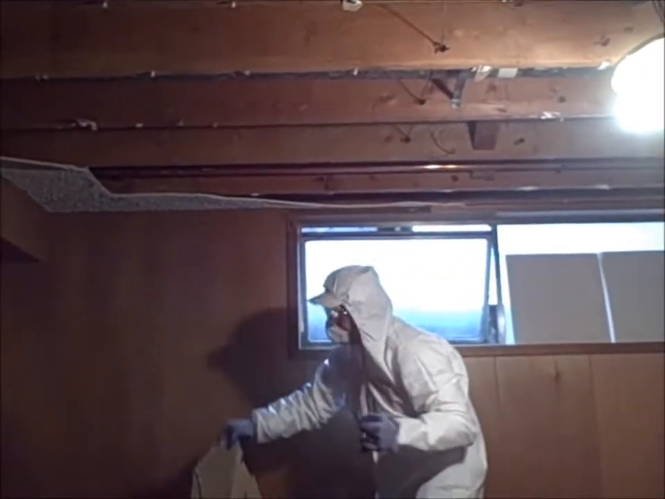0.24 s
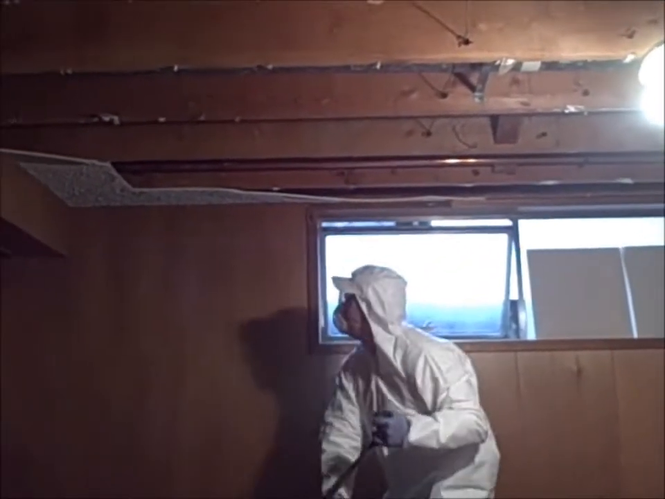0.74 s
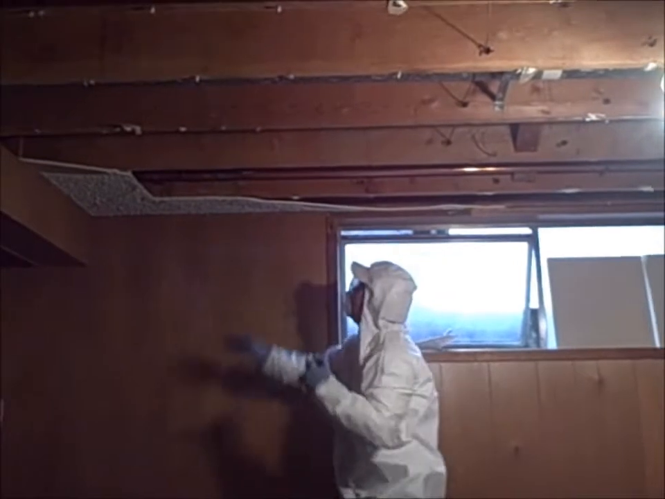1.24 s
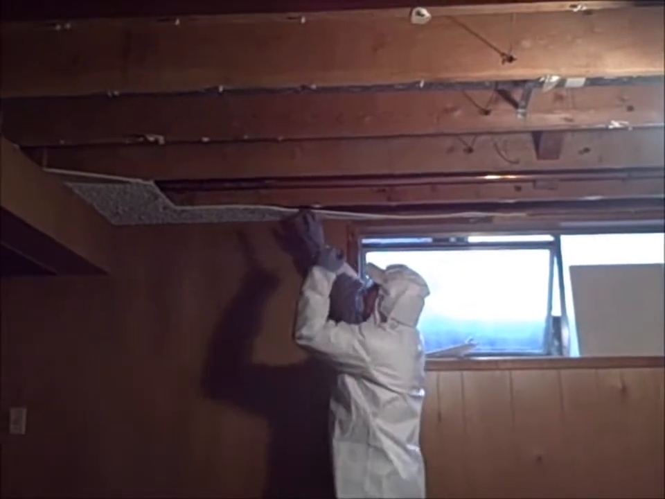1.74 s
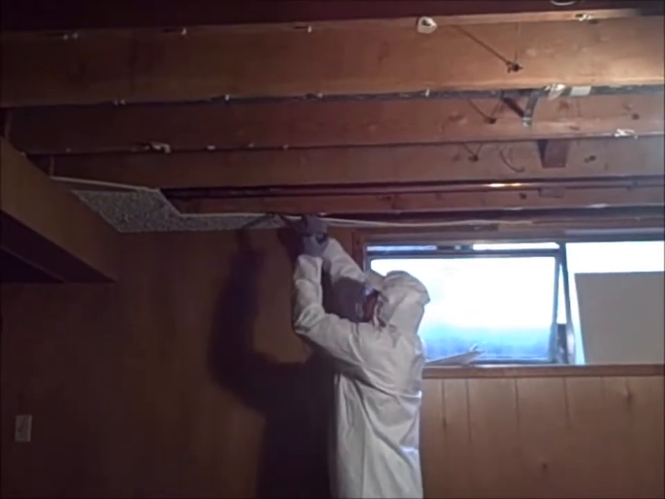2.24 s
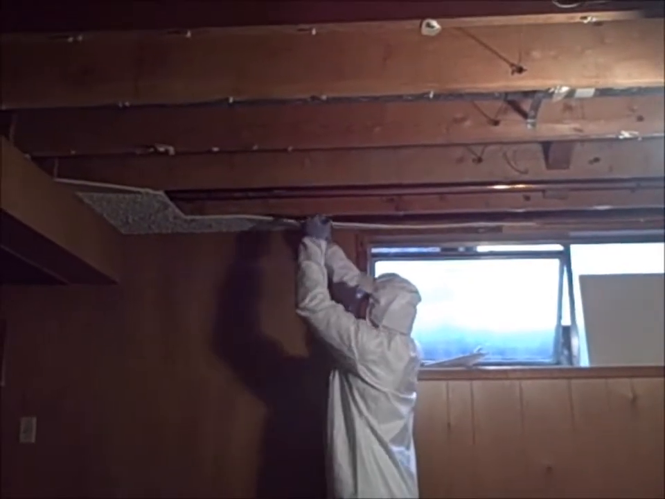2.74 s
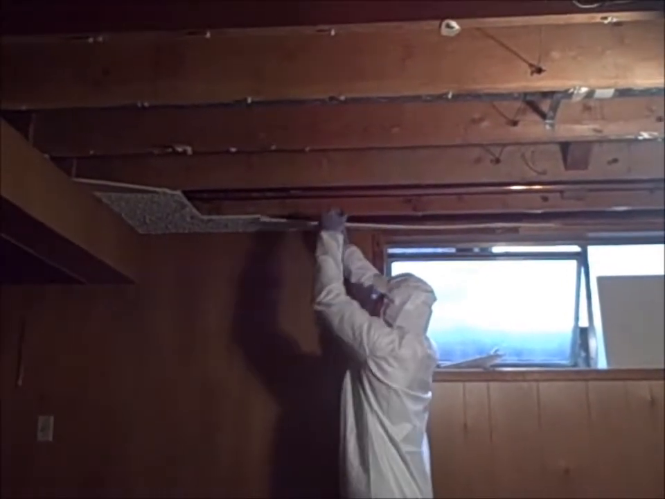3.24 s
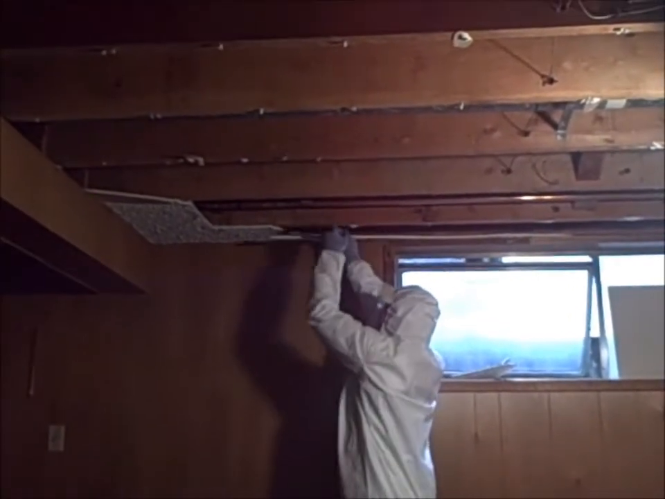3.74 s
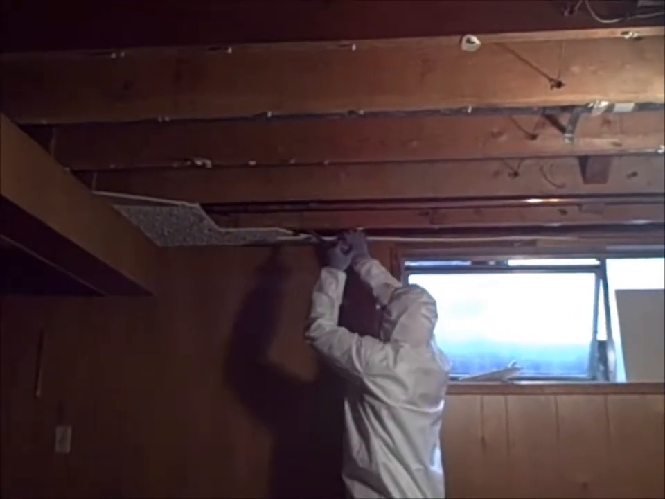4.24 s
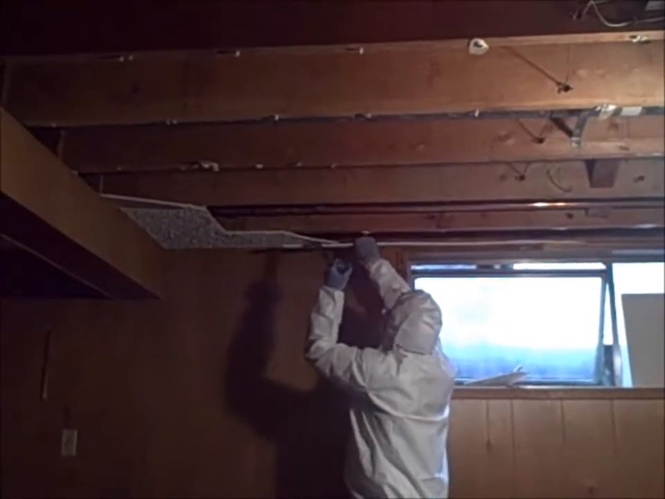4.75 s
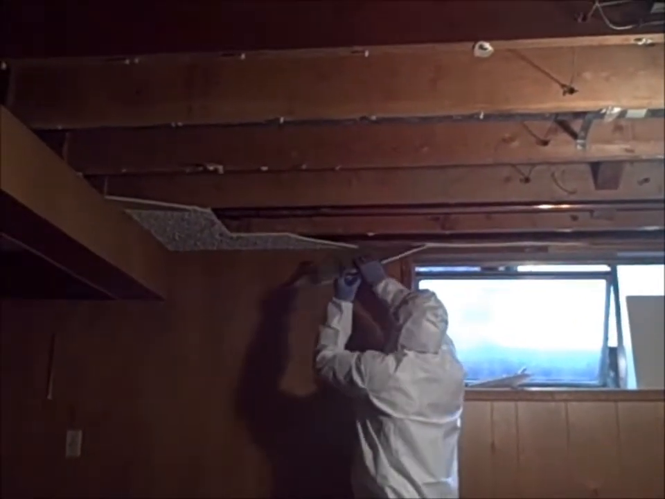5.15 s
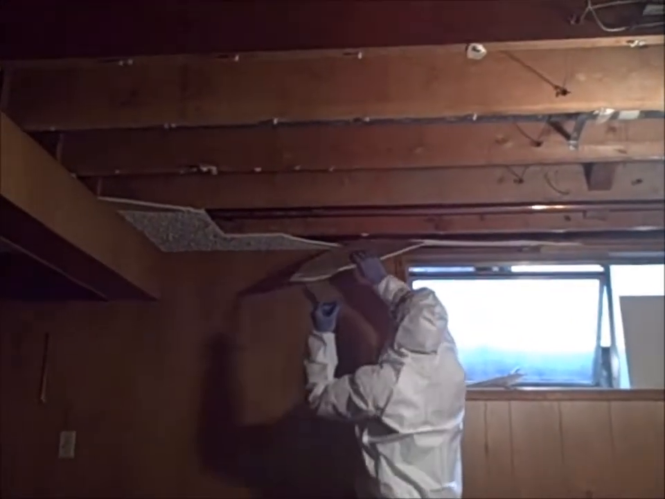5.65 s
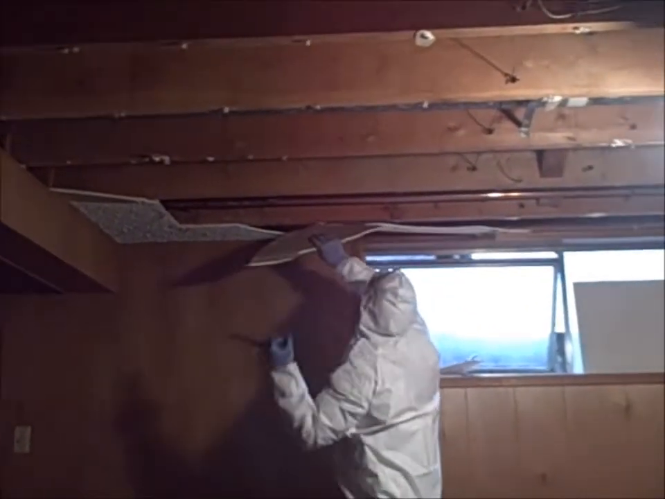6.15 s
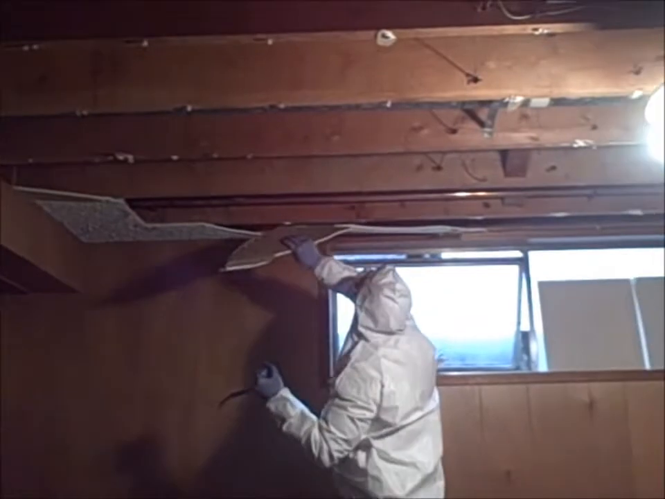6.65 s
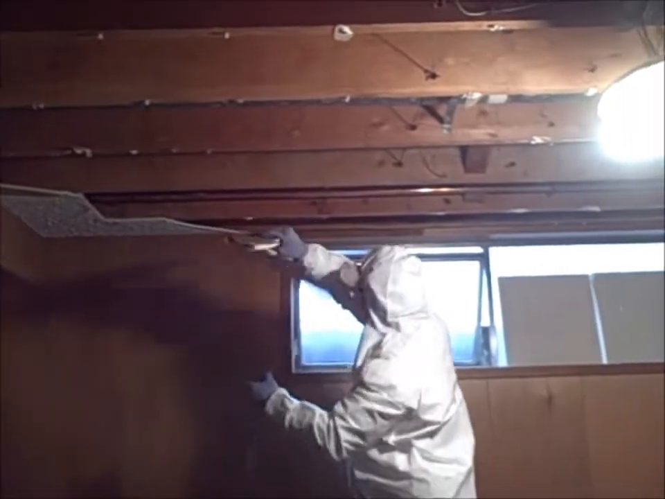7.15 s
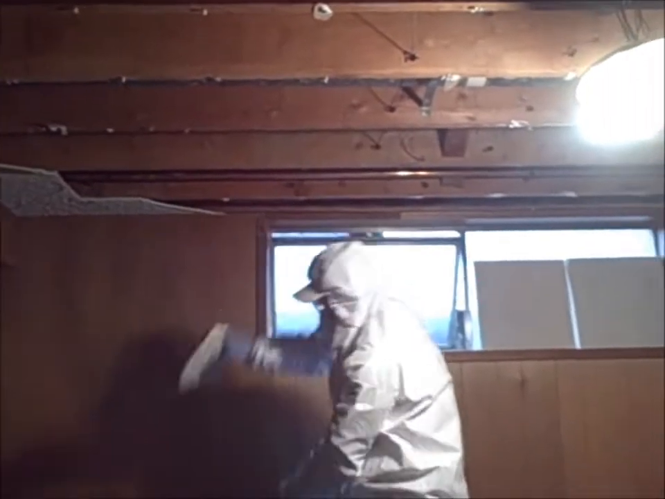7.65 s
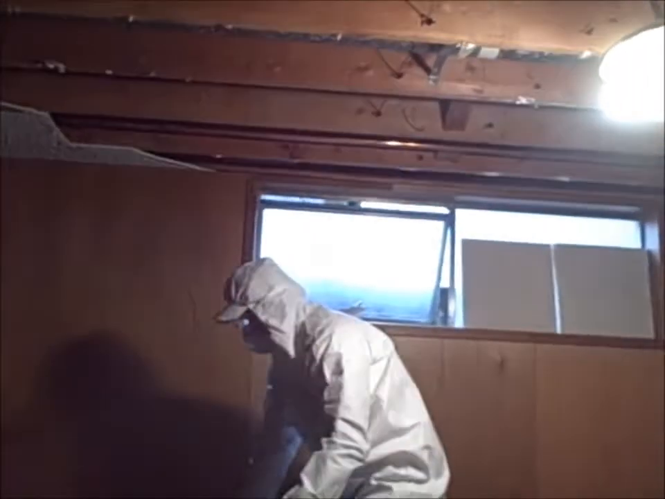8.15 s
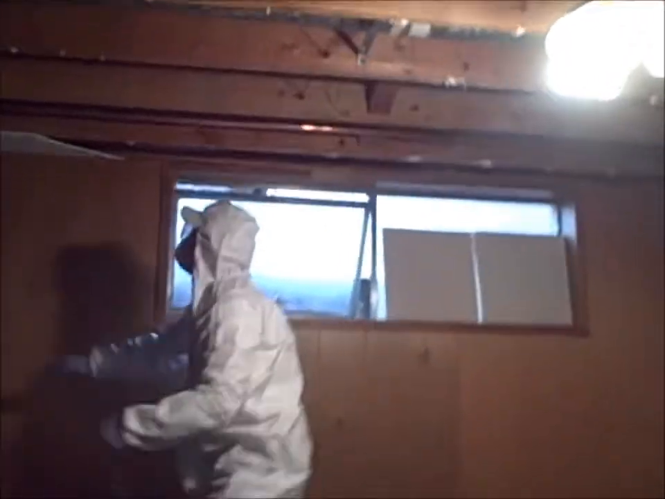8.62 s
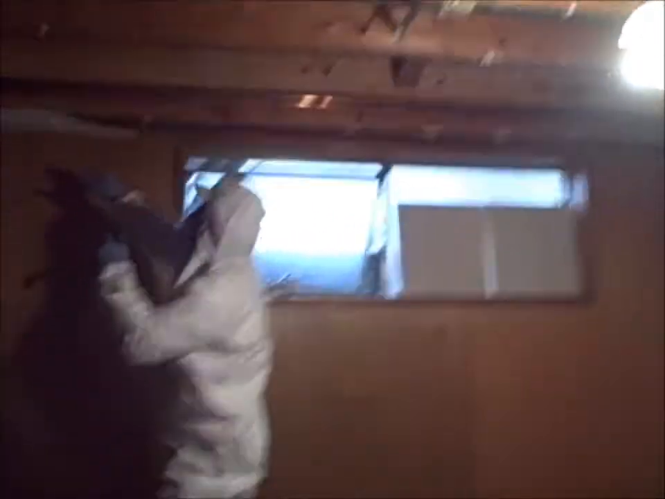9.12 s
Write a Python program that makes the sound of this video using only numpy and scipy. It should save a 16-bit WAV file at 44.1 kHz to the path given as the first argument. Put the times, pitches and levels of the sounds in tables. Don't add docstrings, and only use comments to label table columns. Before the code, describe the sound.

A faint bright hiss and papery suit rustle run throughout a low basement with a short, woody room ring. Soft rubs and light taps come first; from 0.8 to 1.25 s a panel lands with thuds, a sharp snap, low boom and falling crumbs. Rustling and slides fade by 2.4 s into small knocks. Low joist thumps build from 2.9 s, with a cracking break at 3.3 and a scrape with thin steel squeaks at 3.6. More knocks at 4.1-4.6 lead to a strong snapping thud at 4.93, then groaning, hollow boards at 5.2-5.4 and a tearing crack with a low ping at 5.8. Soft rubbing follows. Staples ping brightly at 7.04 and 7.16. Scraping, cracks, pings and ringing boards cluster from 7.45 to 8.05. The loudest hard knock, at 8.5, clatters with a rough squeal; crumbs and rustle trail to about 9.4.

```python
import sys
import numpy as np
from scipy import signal
from scipy.fft import rfft, irfft, next_fast_len
from scipy.io import wavfile
from scipy.ndimage import map_coordinates

SR = 44100
rng = np.random.default_rng(int(sys.argv[2]) if len(sys.argv) > 2 else 0)


def unload_wav(signal):
    wavfile.write(
        sys.argv[1],
        SR,
        np.round(np.clip(np.atleast_2d(signal).T, -1, 1) * 32767).astype(np.int16),
    )


def voltage_ratio(level):
    return 10 ** (np.asarray(level, float) / 20)


N = 413658
SPAN = 32768

# pitch_hz, time_to_fall_60_db_s
ROOM_DECAY = [(60, 0.1489), (150, 0.3057), (500, 0.49717), (1500, 0.31804), (4000, 0.34275),
              (8000, 0.27328), (16000, 0.1174)]
# pitch_hz, level_db
HUSH_COLOUR = [(15, -33.5), (25, -16.5), (129, -2.5), (291, -37.5), (460, -11), (1150, -2.5), (1460, -1),
               (3030, 9.5), (6110, 6), (13400, 1), (15700, 6)]
HUSH_DB = -66
# pitch_hz, gain_db
MIC_RESPONSE = [(20, -20), (40, 0), (13000, 0), (15000, 2.5), (15900, -1)]
TOP_HZ = 15950

# time_s, suit_rustle_db, fibre_scrape_over_rustle_db
MOTION = [(0.0, -52, -3.5), (0.26, -59.5, -3.5), (0.78, -56, -0.5), (1.0, -48, -2), (1.45, -47, -3),
          (1.8, -48, -4), (1.93, -61, 0.5), (2.28, -51, -4.5), (2.42, -73, 4), (4.2, -70.5, 1.5),
          (4.44, -54.5, -1), (5.25, -60.5, -5.5), (5.52, -67, 3), (6.25, -45.5, -1.5), (6.64, -64, 7),
          (7.14, -56.5, -2.5), (7.5, -54, -3.5), (9.3, -54, -1)]
# peak_s, rustle_db, fibre_scrape_over_rustle_db, rise_s_per_10_db, fall_s_per_10_db
CRUMB_SHOWERS = [(1.13, -36.5, 3, 0.04326, 0.1708), (2.6, -59, -2.5, 0.2659, 0.153),
                 (3.0, -59.5, -2.5, 0.2158, 0.1586), (3.37, -42, -19.5, 0.07758, 0.0649),
                 (3.79, -50.5, 1, 0.1262, 0.1349), (3.89, -55.5, 7, 0.1663, 0.0343),
                 (4.93, -49.5, -1, 0.1357, 0.3487), (5.42, -47, 6.5, 0.09258, 0.0248),
                 (5.88, -53, -15, 0.2076, -0.7883), (6.9, -51.5, -3, 0.179, -0.272),
                 (7.27, -50, -4.5, 0.1667, 0.8757), (7.68, -37.5, -2, 0.06146, 0.2698),
                 (7.86, -43.5, -19, 0.088, 0.2133), (7.99, -45, -12, 0.0529, 0.1454),
                 (8.52, -34, -14, 0.02876, -0.0853), (8.64, -53, 4, 0.0619, 0.6934),
                 (9.38, -44.5, 0.5, 0.0637, 0.08)]
# peak_s, panel_groan_db, joist_boom_db, rise_s_per_10_db, fall_s_per_10_db
STRAINS = [(0.89, -66.5, -53.5, 0.0628, 0.3115), (0.99, -47.5, -66.5, 0.0585, 0.2583),
           (1.13, -50.5, -31.5, 0.03085, 0.065), (1.24, -36.5, -49.5, 0.0996, 0.1014),
           (1.84, -67.5, -64.5, 0.0414, 0.22), (2.1, -67, -62.5, 0.3217, 0.4059),
           (2.56, -54.5, -53.5, 0.06267, 0.169), (3.03, -61.5, -56, 0.1209, 0.5),
           (3.36, -35.5, -35, 0.06339, 0.0888), (3.66, -41, -47, 0.0467, 0.1303),
           (3.8, -52.5, -49, 0.157, 0.3534), (4.33, -50, -48.5, 0.1275, 0.1157),
           (4.46, -53, -68.5, 0.1025, 0.0753), (4.99, -40.5, -37, 0.04823, 0.0843),
           (5.25, -43, -56, 0.0649, 0.2325), (5.41, -34.5, -38.5, 0.07657, 0.1107),
           (5.51, -47, -37.5, 0.058, 0.0277), (6.22, -62.5, -84, 0.353, 0.5),
           (6.88, -57, -56, 0.1574, -0.1907), (7.73, -43, -70, 0.07906, 0.2269),
           (7.93, -56, -48.5, 0.0645, 0.02), (8.1, -48, -59, 0.098, 0.0983),
           (5.7, -71.5, -56.5, 0.0524, -0.0024), (7.62, -58.5, -57.5, 0.0302, 0.0575),
           (8.38, -61.5, -68.5, 0.0753, 0.34), (8.62, -48, -52.5, 0.0648, 0.1992)]
# pitch_hz, level_db
SUIT_COLOUR = [(1500, -7), (3500, -4), (6000, 1.5), (9000, 2), (13500, 3), (15800, -6)]
# pitch_hz, level_db
FIBRE_COLOUR = [(500, -1), (1200, -1.5), (2200, -2.5), (4000, -2.5), (6000, -7.5), (9000, -13)]
# pitch_hz, width_hz, level_db
PANEL_MODES = [(312.44, 50.99, 1), (404, 114.67, 2), (645.5, 117.2, -1), (814.3, 183.17, -4.5),
               (1193.2, 196.4, -21.5)]
# pitch_hz, width_hz, level_db
JOIST_MODES = [(41.51, 13.31, -13.5), (98.45, 22.82, -4.5), (141.17, 20.46, 2.5), (246, 60.57, -3.5)]

# peak_s, level_db, pitch_hz, width_hz, fall_s_per_10_db
SQUEALS = [(2.53, -63, 9880, 150, -0.2031), (3.635, -52, 7978, 150, 0.0872),
           (3.66, -46.5, 3002, 249.6, -0.0328), (3.67, -47, 3544, 250.6, -0.0032),
           (3.76, -48.5, 3580, 150, -0.0028), (3.87, -51, 3811, 701.5, 0.0135),
           (3.91, -52, 2951, 199.6, 0.0655), (5.24, -45, 4507, 892.9, 0.1145),
           (5.41, -39.5, 4308, 1095, 0.0303), (7.79, -31.5, 2197, 1199, 0.0909),
           (8.52, -25, 2103, 897.5, 0.0599), (5.835, -37.5, 1501, 896.9, 0.0154)]
SQUEAL_RISE = 0.7301
# start_s, level_db, pitch_woken_most_hz, loss_away_from_it_db_per_octave
BAR_TAPS = [
    (2.478, -58.5, 9880, 28),
    (3.0, -67, 14800, 16),
    (3.64, -47.5, 9880, 27),
    (7.451, -42, 4590, 10),
    (7.675, -39, 9880, 16.5),
]
# pitch_hz, time_to_fall_60_db_s
BAR_MODES = [(2600, 0.1009), (4390, 0.3624), (5720, 0.0972), (9880, 0.3414), (14700, .16)]
# start_s, peak_db, pitch_hz, time_to_fall_60_db_s
WOOD_RINGS = [(1.07, -18.5, 386, 0.0878), (1.12, -23, 501.3, 0.1109), (1.12, -31, 688.7, 0.312),
              (1.121, -28, 123.9, 0.2985), (1.19, -30.5, 558.9, 0.2443), (1.29, -37.5, 642.2, 0.1904),
              (2.93, -49, 300.1, 0.191), (2.93, -52.5, 897.6, 0.2062), (2.03, -53, 249.6, 0.5067),
              (4.095, -28, 154.2, 0.1719), (4.268, -30.5, 998.9, 0.0954), (4.32, -36, 419.9, 0.308),
              (4.471, -39, 158.3, 0.2343), (5.207, -30, 606.9, 0.317), (5.21, -38, 885.8, 0.3104),
              (5.21, -33, 289.8, 0.4164), (5.25, -34.5, 600.4, 0.2553), (5.39, -34.5, 772.4, 0.2942),
              (5.4, -30, 333.4, 0.2967), (5.45, -31.5, 329.9, 0.3951), (5.82, -37.5, 1750, 0.203),
              (7.61, -36, 1600, 0.1666), (7.882, -25, 404, 0.3233), (7.882, -24.5, 532.4, 0.374),
              (7.884, -25, 770, 0.3721), (7.884, -32.5, 888.1, 0.364), (8.02, -37, 400.4, 0.3852),
              (7.882, -26.5, 214.4, 0.2881), (8.472, -25.5, 389.7, 0.214), (8.472, -28, 199.1, 0.2115),
              (8.506, -21, 170.1, 0.2874), (8.56, -26.5, 811.3, 0.5155), (0.83, -39.5, 120.8, 0.4087),
              (3.32, -34, 996.9, 0.218), (4.268, -32.5, 701.6, 0.1998), (4.27, -36, 1297, 0.1519),
              (5.822, -36.5, 449, 0.203), (7.16, -48, 599.5, 0.1993), (1.13, -27.5, 260.4, 0.4026)]
# pitch_hz, level_db, time_to_fall_60_db_s
OFFCUT_MODES = [(340.31, -17, 0.7064), (734, -6, 0.3067), (790.83, -11.5, 0.585), (1225, -3, 0.281),
                (1365.7, -6.5, 0.1581), (1806, -7.5, 0.233), (1960, -7, 0.3336), (2292.4, -10.5, 0.327),
                (2634.6, -0.5, 0.1468), (2886.1, -5, 0.244), (3649.2, -6, 0.1577), (3879.6, -12, 0.3446),
                (3942.2, -6.5, 0.1592), (4350, -12.5, 0.2426)]
# start_s, level_db
OFFCUT_HITS = [
    (8.473, -37.5),
    (8.506, -24),
    (8.515, -27),
]
# start_s, peak_db, pitch_hz
STAPLES = [
    (4.158, -38, 3039),
    (5.832, -25.5, 1602),
    (7.042, -21, 4545),
    (7.161, -18.5, 3866),
    (7.78, -23.5, 2599),
    (8.022, -24, 2199),
]
# start_s, level_db
PANEL_DROPS = [
    (0.833, -52),
    (.95, -43),
    (1.118, -34),
    (1.22, -43.5),
]

# start_s, peak_db, board_pitch_hz, floor_boom_db
THUDS = [(0.644, -49.5, 915, -23.5), (0.826, -32.5, 699.8, -10.5), (0.945, -21.5, 109.3, -12),
         (1.07, -15.5, 387.7, -25.5), (1.118, -19, 406.3, -7.5), (2.472, -35.5, 270.1, -12),
         (2.539, -40, 162.5, -16.5), (2.932, -32.5, 145.5, -6.5), (3.225, -26.5, 146.5, -1),
         (3.311, -20.5, 321.4, -9), (3.638, -24, 162, -9), (4.101, -32.5, 151.5, -13),
         (4.266, -23, 474.1, -28.5), (4.48, -31, 160, -7.5), (4.635, -33, 147.9, -19),
         (4.931, -13, 328.5, -13), (5.206, -29.5, 593.2, -18.5), (5.399, -17.5, 308.3, -18.5),
         (5.821, -35.5, 455, -35), (6.877, -34.5, 233.1, -26.5), (7.037, -42, 598.3, -25),
         (7.16, -41, 654.7, -18.5), (7.445, -43, 991, -23), (7.608, -27, 431.1, -35),
         (7.769, -31.5, 419.9, -27), (7.88, -18.5, 424.2, -29), (8.013, -36.5, 372.7, -6.5),
         (8.473, -20, 783, -6), (8.504, -9.5, 771, -15)]
# start_s, peak_db, pitch_hz
OVERTONES = [(0.837, -36.5, 391.9), (0.943, -32.5, 111.3), (1.112, -23.5, 851.9), (2.94, -33, 276.4),
             (3.636, -25.5, 246), (4.265, -35, 905.1), (4.932, -34, 901.9), (5.206, -20, 245.6),
             (5.245, -25.5, 594.9), (7.88, -18, 755.5), (7.88, -17.5, 232.9), (7.882, -18.5, 388.2),
             (7.894, -20, 801.5), (8.014, -39, 204.8), (8.508, -20.5, 757.7), (8.506, -15, 389.1),
             (8.529, -15.5, 843.9)]
BOARD_T60, OVERTONE_BOOM_DB = 0.060797, -22
# pitch_hz, width_hz, level_db
FLOOR_MODES = [(133.85, 16.9, -5.5), (183.9, 86.93, 6)]

# start_s, peak_db
FIBRE_POPS = [
    (0.9694, -28),
    (1.1203, -9.5),
    (4.929, -21),
    (5.8236, -21),
    (8.021, -13.5),
]
# start_s, peak_db, body_db, top_db
RUBS = [(0.1245, -42.5, -11.5, -13), (0.298, -45.5, -2.5, 1.5), (0.3302, -38, -19.5, -2.5),
        (0.7427, -34, -13, -18.5), (1.2438, -42.5, -15, -9), (1.722, -34.5, -3.5, 6),
        (2.0694, -49, -12, -4), (2.1993, -43, -9.5, -5), (2.259, -42.5, -8, 0.5), (2.529, -42, -10, -9),
        (2.7997, -51, -9, -1.5), (3.2095, -37.5, -11, -10.5), (3.6203, -28, -17.5, -10),
        (3.6402, -23.5, -16, -12), (3.7575, -44.5, -12.5, -12), (4.5694, -40, -7, 1.5),
        (4.806, -42, -9.5, 3), (5.203, -30, -17, -4.5), (5.35, -31, -14, -5), (6.011, -39.5, -21, 3),
        (6.0758, -36, -9, 0), (7.358, -38.5, -20.5, -0.5), (7.5266, -30, -16.5, -7.5),
        (7.6672, -19.5, -11, -7.5), (7.999, -21.5, -11.5, -5.5), (8.0138, -23, -11, -36),
        (8.9094, -38.5, -7.5, 2.5), (9.0092, -39, -0.5, 1.5), (9.2323, -34.5, -6.5, -4)]
# start_s, peak_db, body_db, top_db,
# first_snap_db
HARD_CRACKS = [(0.2159, -43, -7.5, -9.5, -3), (0.268, -44, -14, -5.5, -2.5), (0.6469, -47.5, -0.5, 7, -5),
               (0.8277, -25.5, -13, -4.5, -9), (0.9477, -30.5, -11, -4.5, -15),
               (0.9687, -27.5, -18.5, -5.5, 0), (1.07, -27, -10, -5.5, -8), (1.1173, -30, -14, -0.5, 3.5),
               (7.447, -36.5, -3, -5, -1), (7.6075, -24, -5.5, -7.5, -10), (7.7505, -20.5, -8.5, -8, -5.5),
               (7.7722, -18, -12, -4, 3), (7.882, -17, -5.5, -11, -3.5), (8.4734, -21.5, -2, -8, -8.5),
               (8.5044, -5.5, -3, -20, -3.5),
               (2.9248, -49.5, 2, -15, -1), (3.273, -32, -32.5, -10.5, -3),
                  (3.3079, -16, -16.5, -8, -6.5), (4.1584, -42, 5, -7.5, -2), (4.2677, -49.5, 22, -1, -1.5),
                  (4.7205, -54.5, 1.5, -11.5, 1.5), (4.9176, -30.5, -27.5, -6, -12),
                  (4.9282, -16, -16.5, -12, -2), (5.569, -38.5, -16, -17, 1.5),
                  (5.6523, -48, -2.5, -3.5, 0), (5.6878, -40, -16.5, -7.5, 0),
                  (5.7252, -32.5, -13.5, -7.5, -12), (5.8194, -28, -8.5, -3.5, -6.5),
                  (6.7824, -37, -1.5, 4.5, -11.5), (6.8789, -34, -1, -8, -14),
                  (7.042, -30, -18, -13.5, 1.5), (7.161, -26.5, -26.5, -10, -2.5)]
CRACK_S, RUB_S, RUB_SNAP_DB = 0.008, 0.0135, -30


def unit(x):
    return x / np.sqrt(np.mean(x ** 2, axis=-1, keepdims=True) + 1e-20)


def along(points, hz):
    point_hz, value = np.transpose(points)
    return np.interp(np.log(hz + 1), np.log(point_hz + 1), value)


def resonances(modes, f):
    total = 0
    for k, (centre, width, db) in enumerate(modes):
        drag = 1j * f * width
        total = total + (-1) ** k * voltage_ratio(db) * drag / (centre * centre - f * f + drag)
    return total


def filtered(x, response):
    size = next_fast_len(N + SPAN)
    return irfft(rfft(x, size) * response(np.fft.rfftfreq(size, 1 / SR)), size)[:N]


def causal(db):
    cepstrum = irfft(np.log(voltage_ratio(db) + 1e-6))
    half = len(cepstrum) // 2
    cepstrum[1:half] *= 2
    cepstrum[half + 1:] = 0
    return np.exp(rfft(cepstrum))


def tails(count):
    hz, t, grid = signal.stft(rng.standard_normal((count, SPAN)), SR, nperseg=256)
    fade = voltage_ratio(-60 * t / along(ROOM_DECAY, hz)[:, None])
    tail = signal.istft(grid * fade, SR, nperseg=256)[1][:, :SPAN]
    return unit(tail) / np.sqrt(SPAN)


def in_room(times, sounds, wet_db, gap_s):
    out, gap = np.zeros(N + 3 * SPAN), round(gap_s * SR)
    wet = signal.fftconvolve(sounds, tails(count=len(times)), axes=1)
    for s, direct, echo in zip(times, sounds, wet):
        at = round(s * SR)
        out[at:at + len(direct)] += direct
        out[at + gap:at + gap + len(echo)] += voltage_ratio(wet_db) * echo
    return out[:N]


def grit(rate, smooth):
    snaps = (rng.random(N) < rate / SR) * rng.standard_normal(N)
    return unit(snaps) + smooth * rng.standard_normal(N)


def flutter(rate):
    knots = rng.standard_normal(int(N * rate / SR) + 4)
    return map_coordinates(knots, [np.arange(N) * rate / SR])


def swells(peak_s, db, rise_s, fall_s):
    dt = np.arange(0, N + 64, 64) / SR - peak_s[:, None]
    rising, falling = -dt / np.abs(rise_s)[:, None], dt / np.abs(fall_s)[:, None]
    shape_db = -10 * np.where(dt < 0, rising, falling)
    gain = np.sqrt(np.sum(voltage_ratio(db[:, None] + shape_db) ** 2, axis=0))
    return np.interp(np.arange(N) / 64, np.arange(dt.shape[1]), gain)


def hush():
    noise = rng.standard_normal(N)
    return voltage_ratio(HUSH_DB) * unit(filtered(noise, lambda f: voltage_ratio(along(HUSH_COLOUR, f))))


def work():
    s, move_db, fibre_db = np.transpose(MOTION)
    time = np.arange(N) / SR
    rustle = voltage_ratio(np.interp(time, s, move_db))
    rub = voltage_ratio(np.interp(time, s, move_db + fibre_db))

    s, db, fibre_db, rise, fall = np.transpose(CRUMB_SHOWERS)
    rustle = np.hypot(rustle, swells(s, db, rise, fall))
    rub = np.hypot(rub, swells(s, db + fibre_db, rise, fall))

    s, groan_db, boom_db, rise, fall = np.transpose(STRAINS)
    flex, load = swells(s, groan_db, rise, fall), swells(s, boom_db, rise, fall)

    jerk = flutter(16)
    suit = unit(filtered(grit(2500, smooth=1.37), lambda f: voltage_ratio(along(SUIT_COLOUR, f))))
    scrape = unit(filtered(grit(1500, smooth=1.694), lambda f: voltage_ratio(along(FIBRE_COLOUR, f))))
    groan = unit(filtered(grit(300, smooth=0.9987), lambda f: resonances(PANEL_MODES, f)))
    boom = unit(filtered(grit(80, smooth=0.948), lambda f: resonances(JOIST_MODES, f)))
    rubbing = rustle * voltage_ratio(1.741 * jerk) * suit + rub * voltage_ratio(0.678 * jerk) * scrape
    levering = flex * voltage_ratio(1.237 * flutter(14)) * groan + load * voltage_ratio(1.063 * flutter(9)) * boom
    return rubbing + levering


def squeals():
    before = 8192
    t, out = np.arange(-before, 12288) / SR, np.zeros(N + SPAN)
    for s, db, hz, width, fall in SQUEALS:
        waver = np.cumsum(rng.standard_normal(len(t))) * np.sqrt(2 * np.pi * abs(width) / SR)
        swell_db = -10 * np.abs(t) / abs(fall) / np.where(t < 0, SQUEAL_RISE, 1)
        tone = np.sin(2 * np.pi * hz * t + waver)
        out[round(s * SR) - before:][:len(t)] += voltage_ratio(db + swell_db) * tone
    return out[:N]


def bar():
    t, out = np.arange(8192) / SR, np.zeros(N + SPAN)
    for s, tap_db, tap_hz, loss in BAR_TAPS:
        for hz, t60 in BAR_MODES:
            db = tap_db - loss * abs(np.log2(hz / tap_hz))
            shake = np.cumsum(rng.normal(0, 0.07795, len(t)))
            tone = np.sin(2 * np.pi * hz * t + shake)
            out[round(s * SR):][:len(t)] += voltage_ratio(db - 0.5 - 60 * t / t60) * tone
    return out[:N]


def rings():
    t, out = np.arange(12288) / SR, np.zeros(N + SPAN)
    offcut = [(s, db + level, hz, t60) for s, db in OFFCUT_HITS for hz, level, t60 in OFFCUT_MODES]
    for s, db, hz, t60 in WOOD_RINGS + offcut:
        waver = np.cumsum(rng.normal(0, 0.040327, len(t)))
        swell = 1 - np.exp(-t * hz / 2.539)
        tone = np.sin(2 * np.pi * hz * t + waver)
        out[round(s * SR):][:len(t)] += voltage_ratio(db - 60 * t / t60) * swell * tone
    return out[:N]


def staples():
    t = np.arange(1024) / SR
    s, db, hz = np.transpose(STAPLES)[:, :, None]
    pings = voltage_ratio(db - 60 * t / 0.00362) * np.sin(2 * np.pi * hz * t)
    return in_room(s[:, 0], pings, wet_db=1.0, gap_s=0.0025)


def drops():
    t, out = np.arange(SPAN) / SR, np.zeros(N + SPAN)
    heave = np.sin(2 * np.pi * 42 * t) + 0.5 * np.sin(2 * np.pi * 31 * t)
    heave += 0.607 * np.sin(2 * np.pi * 120 * t) * voltage_ratio(-60 * t / 0.2655)
    for s, db in PANEL_DROPS:
        out[round(s * SR):][:SPAN] += voltage_ratio(db - 60 * t / 0.46) * (1 - np.exp(-t / 0.01193)) * heave
    return out[:N]


def thuds():
    t, hz = np.arange(8192) / SR, np.fft.rfftfreq(8192, 1 / SR)
    boom = irfft(resonances(FLOOR_MODES, hz) * resonances([(150, 630, 0)], hz))
    boom = boom / np.abs(boom).max()
    rows, sounds = THUDS + [(*row, OVERTONE_BOOM_DB) for row in OVERTONES], []
    for s, db, note_hz, boom_db in rows:
        joist = note_hz < 175
        notes = note_hz * np.array([[0.55], [0.75], [1.12], [1.4], [1.85], [2.5]])
        note_db = np.array([[-11], [-7], [-6], [-9], [-13], [-17]])
        levels = voltage_ratio(note_db - 2.462 * joist + rng.normal(0, 1.0, (6, 1)))
        ring = np.sin(2 * np.pi * note_hz * t)
        ring += np.sum(levels * np.sin(2 * np.pi * notes * t), axis=0)
        ring *= voltage_ratio(-60 * t / (BOARD_T60 * (1 + 0.815 * joist)))
        ring *= 1 - np.exp(-t * note_hz / (1.3653 + 1.075 * joist))
        push = voltage_ratio(boom_db + 2.5 - 4.107 * joist) * boom
        sounds.append(voltage_ratio(db - 3.5) * (ring + push))
    return in_room(np.transpose(rows)[0], np.array(sounds), wet_db=2.0, gap_s=0.0050679)


def pops():
    t = np.arange(256) / SR
    push = np.sin(2 * np.pi * 3800 * t) * np.exp(-t / 0.00013615)
    push += 0.5 * np.sin(2 * np.pi * 900 * t) * np.exp(-t / 0.0006304)
    s, db = np.transpose(FIBRE_POPS)
    snaps = in_room(s, voltage_ratio(db + 0.5)[:, None] * push, wet_db=0.5, gap_s=0.003)
    return filtered(snaps, lambda f: 1j * f / (200 + 1j * f))


def breaks(rows, length, rise_share, gain_db):
    t, hz = np.arange(SPAN) / SR, np.fft.rfftfreq(SPAN, 1 / SR)
    out = np.zeros(N + 2 * SPAN)
    for (s, db, body_db, top_db, snap_db), tail in zip(rows, tails(count=len(rows))):
        u = t / length
        rise = rise_share * voltage_ratio(-snap_db / 2)
        tear = 0.5 * rng.standard_normal(SPAN) * np.exp(-u) * (1 - np.exp(-u / rise))
        build_up = (1 - np.exp(-t / (rise * length + 0.002493))) ** 2
        echo = voltage_ratio(5) * np.linalg.norm(tear) * tail * build_up
        snap = voltage_ratio(snap_db + 3.5) * np.exp(-t / 0.0005242) * np.sign(rng.standard_normal(SPAN))
        clumps = map_coordinates(rng.standard_normal(64), [5 * np.log2(1 + hz / 100)])
        colour = [(40, body_db - 33), (120, body_db - 12.5), (400, body_db + 5.5), (900, body_db + 11.5),
                  (2000, body_db * 0.5 + 7.0), (3000, 1.008), (4300, 0.255), (5500, -1.991),
                  (7000, top_db * 0.5 + 1), (10000, top_db + 3.5), (16000, top_db + 1.5)]
        response = causal(along(colour, hz) + 1.405 * clumps)
        sound = irfft(rfft(snap + tear + echo) * response)
        out[round(s * SR):][:SPAN] += voltage_ratio(db + gain_db) * sound
    return out[:N]


def cracks():
    rubs = [(*row, RUB_SNAP_DB) for row in RUBS]
    hard = breaks(HARD_CRACKS, CRACK_S, rise_share=0.08842, gain_db=3.5)
    return hard + breaks(rubs, RUB_S, rise_share=0.16784, gain_db=7.0)


def scene():
    background = hush() + work()
    metal_and_wood = squeals() + bar() + rings() + staples()
    blows = drops() + thuds()
    return (background + metal_and_wood + blows + pops() + cracks())[None]


def top_cut(x):
    return signal.sosfilt(signal.butter(12, 17020, fs=SR, output="sos"), x)


def record(dry):
    x = filtered(dry[0], lambda f: voltage_ratio(along(MIC_RESPONSE, f)))
    x = x / (1 + np.abs(x / 0.52) ** 6) ** (1 / 6)
    x = filtered(x, lambda f: f < TOP_HZ)
    return top_cut(x[None])


dry = scene()
out = record(dry)
unload_wav(out)
```